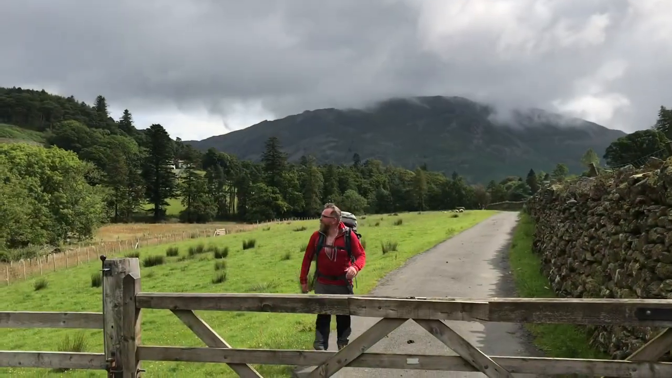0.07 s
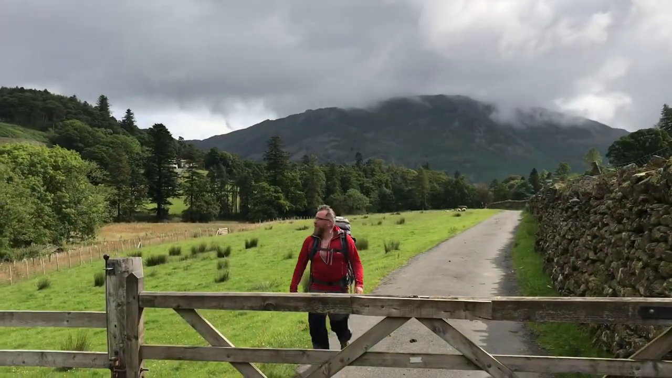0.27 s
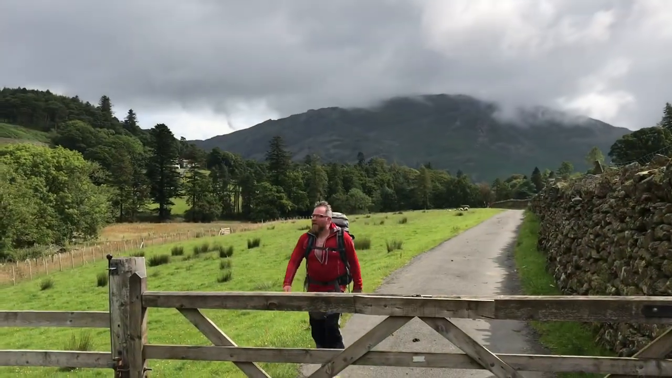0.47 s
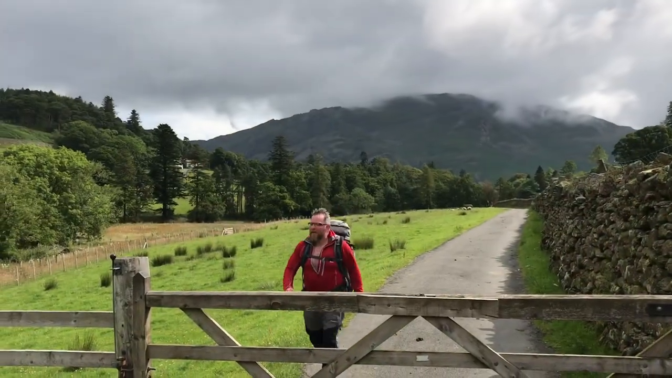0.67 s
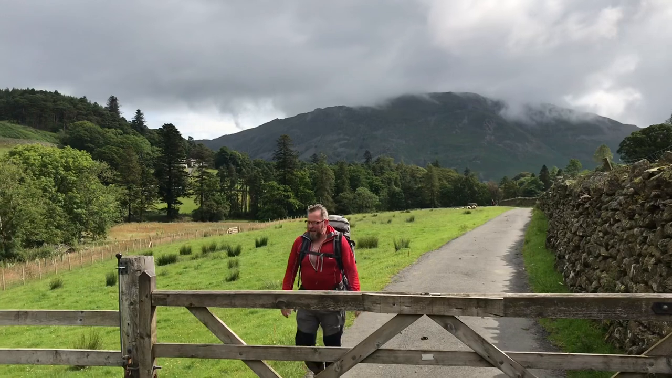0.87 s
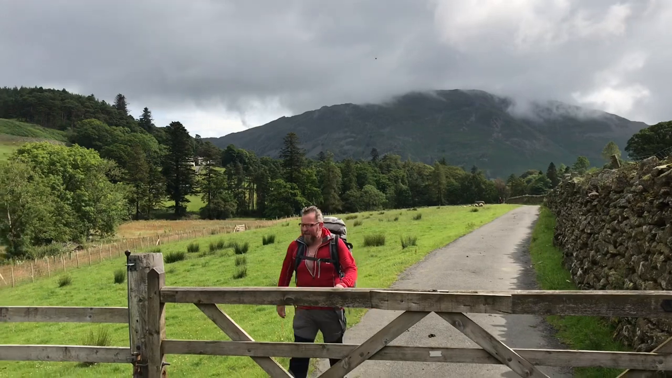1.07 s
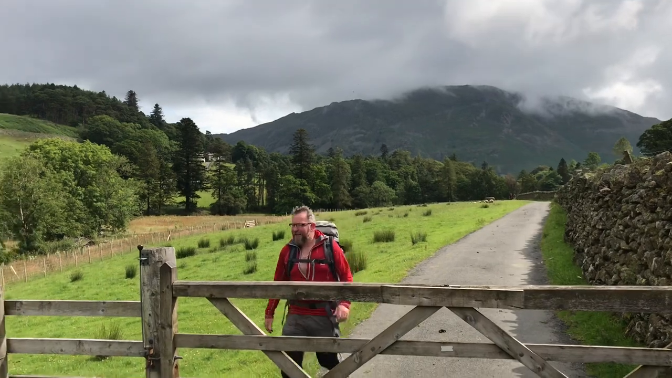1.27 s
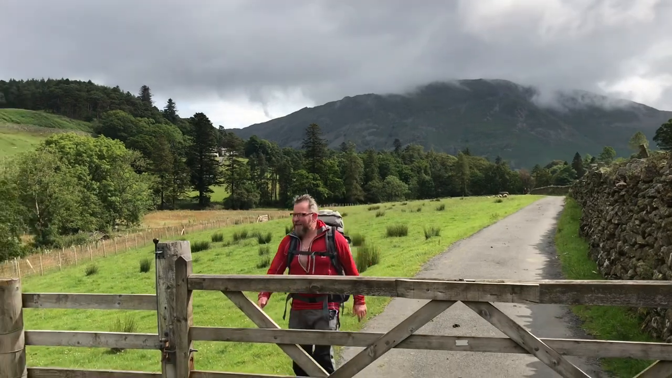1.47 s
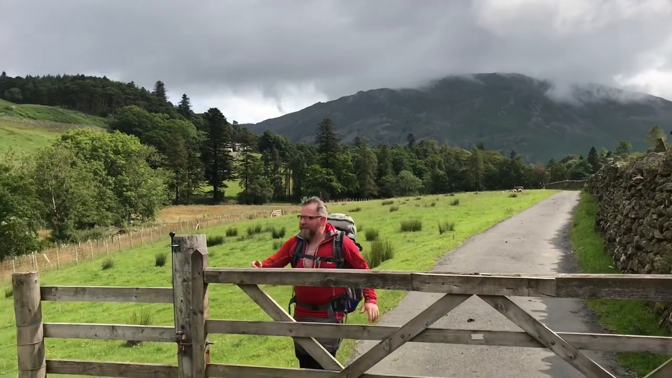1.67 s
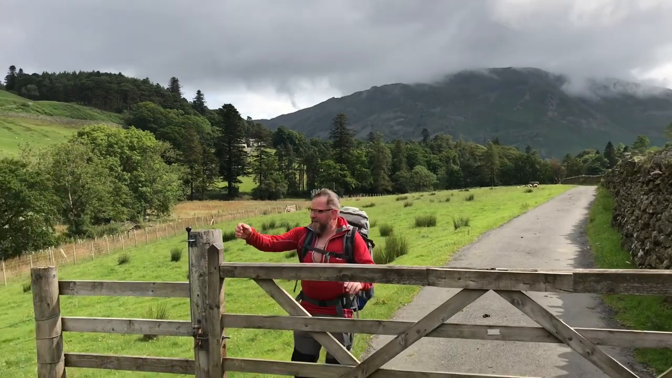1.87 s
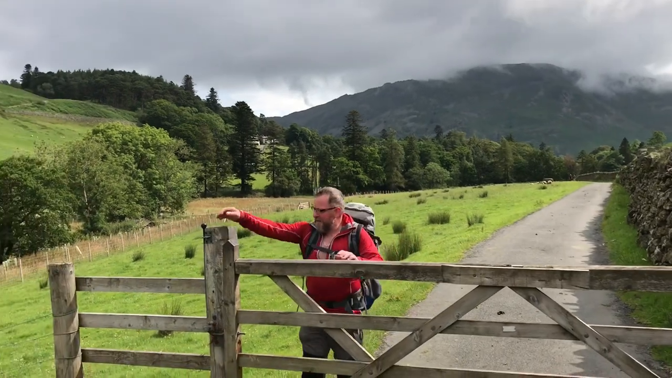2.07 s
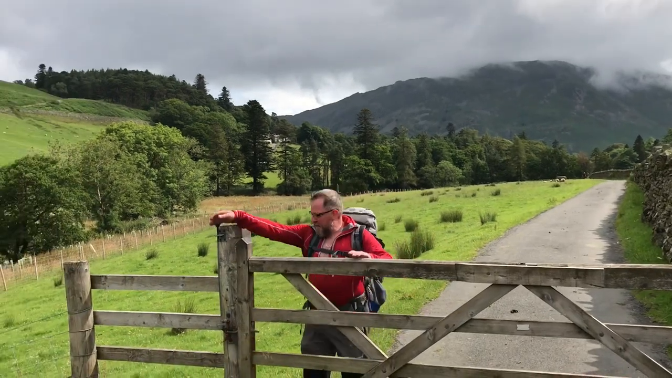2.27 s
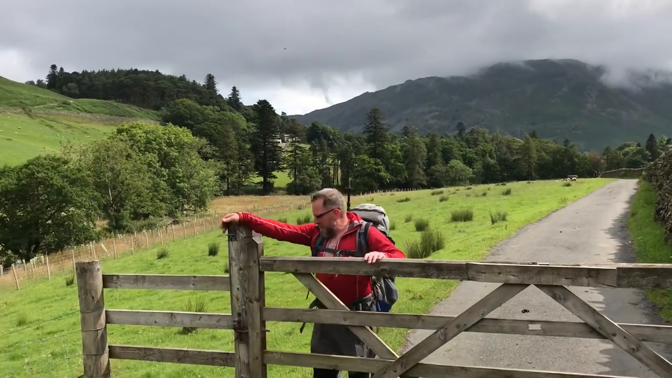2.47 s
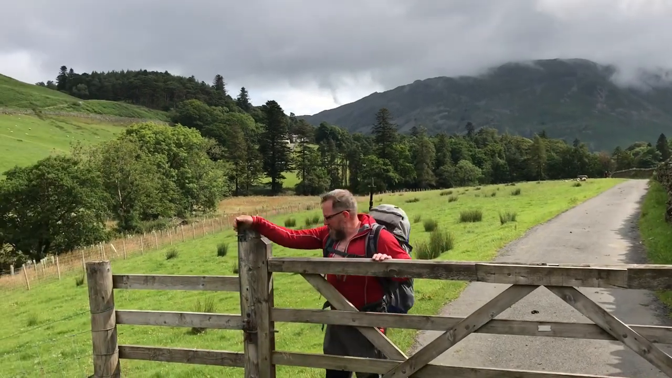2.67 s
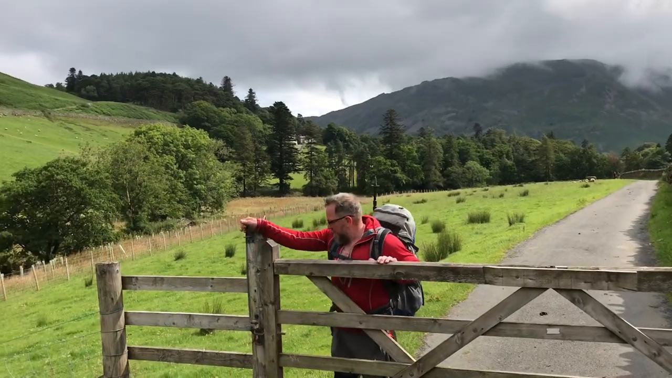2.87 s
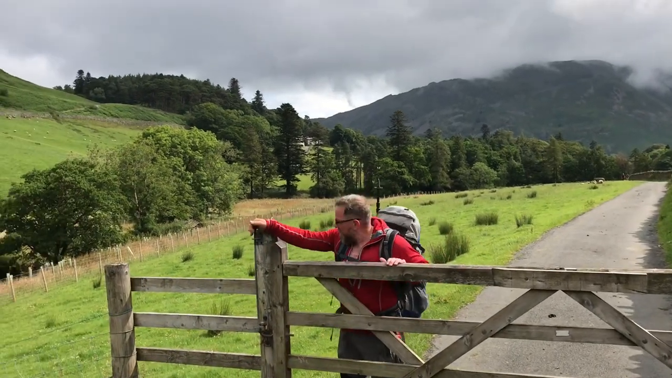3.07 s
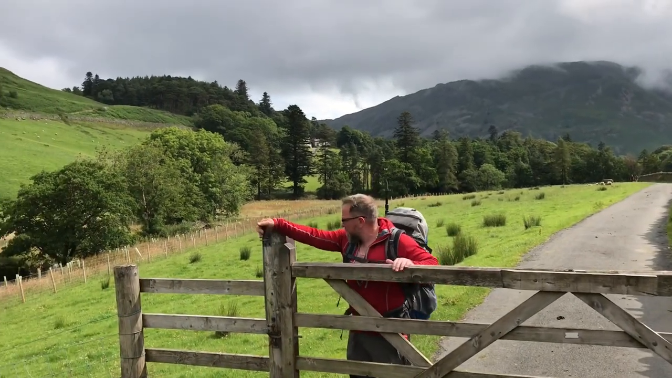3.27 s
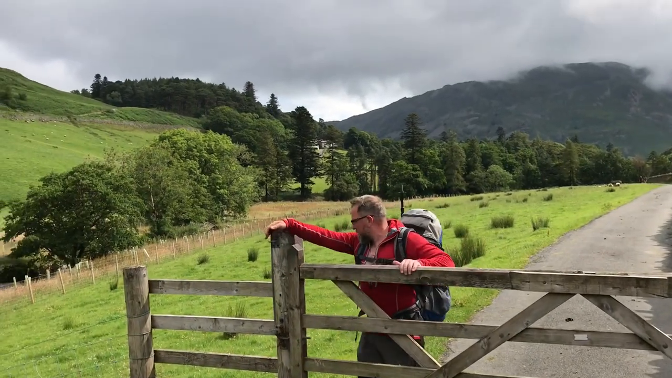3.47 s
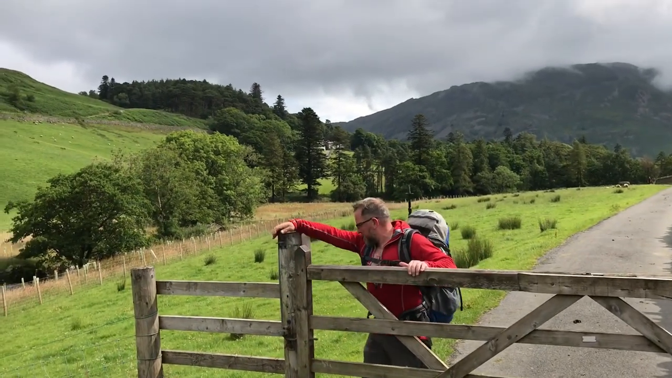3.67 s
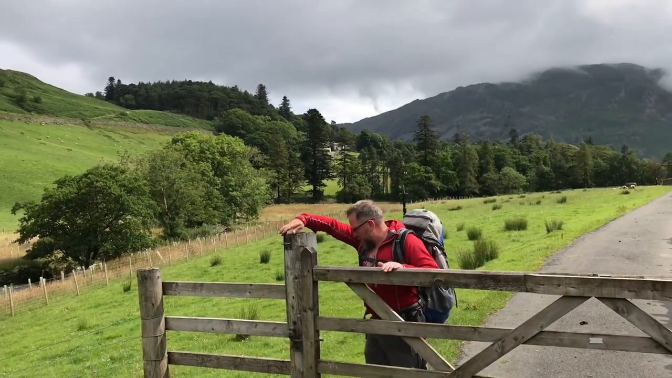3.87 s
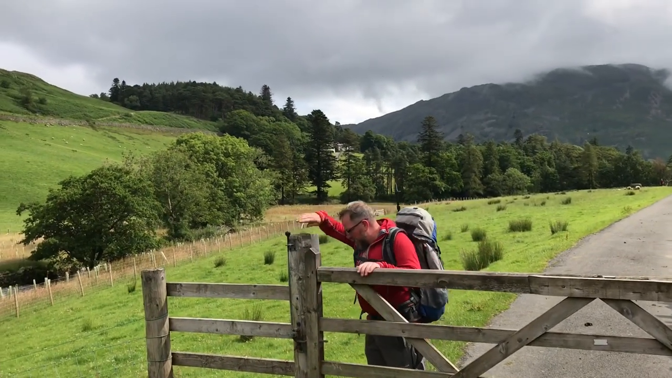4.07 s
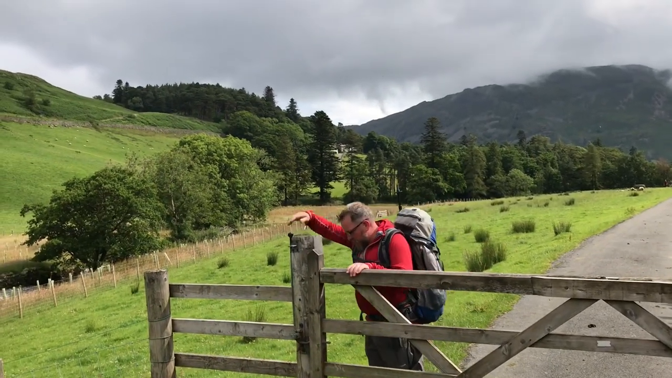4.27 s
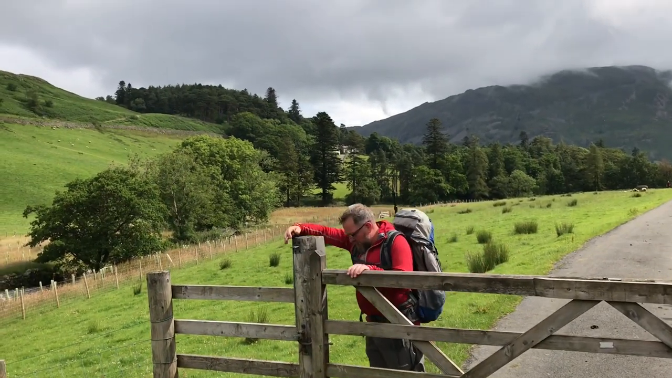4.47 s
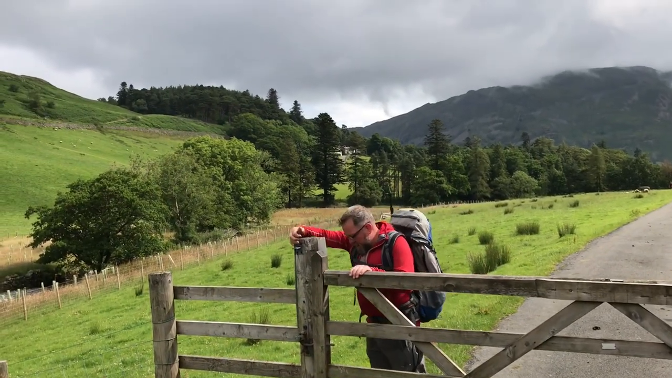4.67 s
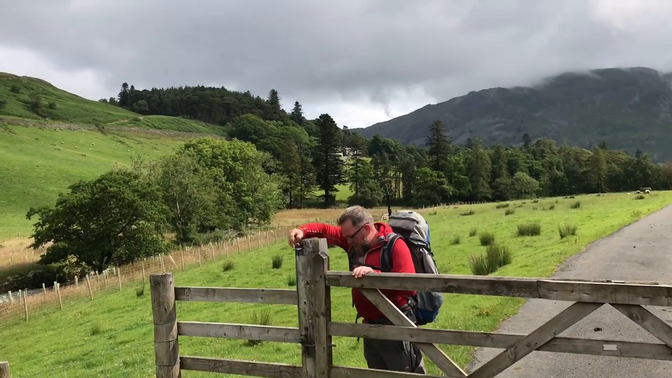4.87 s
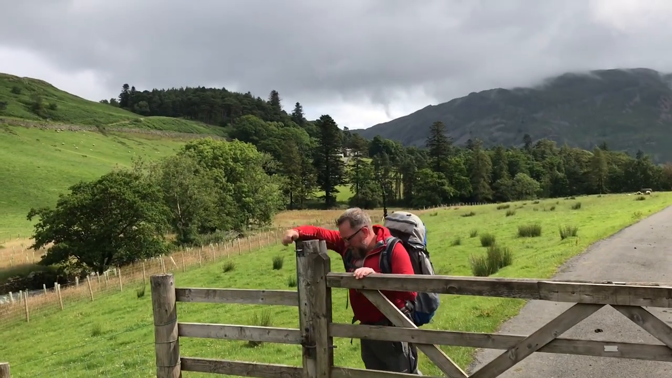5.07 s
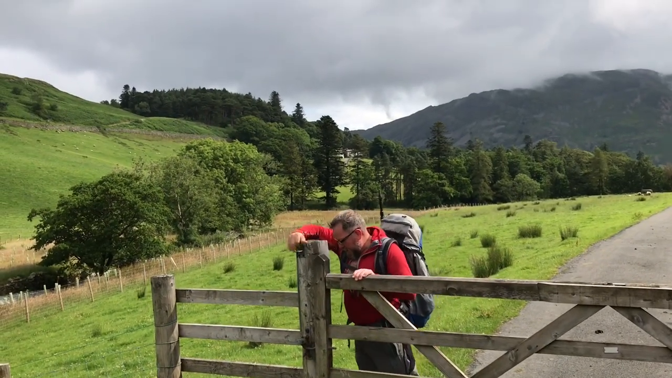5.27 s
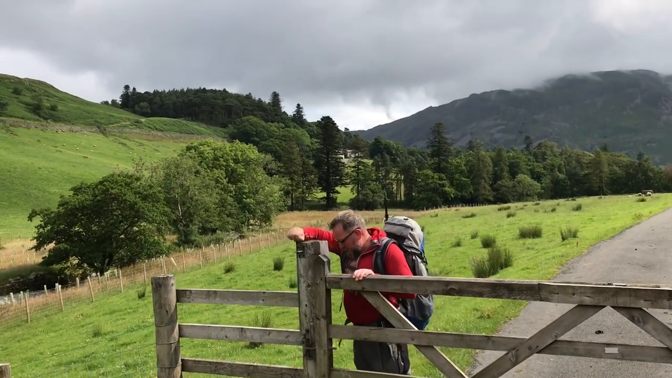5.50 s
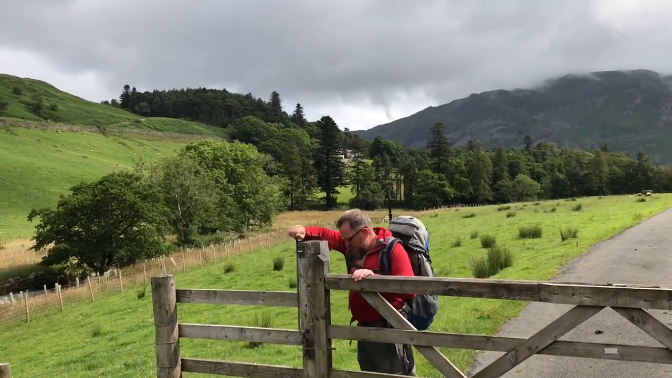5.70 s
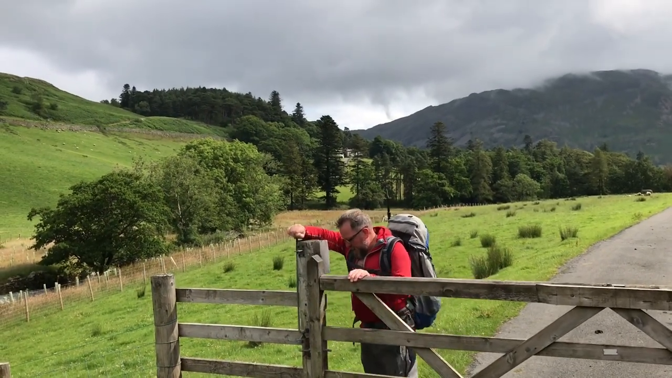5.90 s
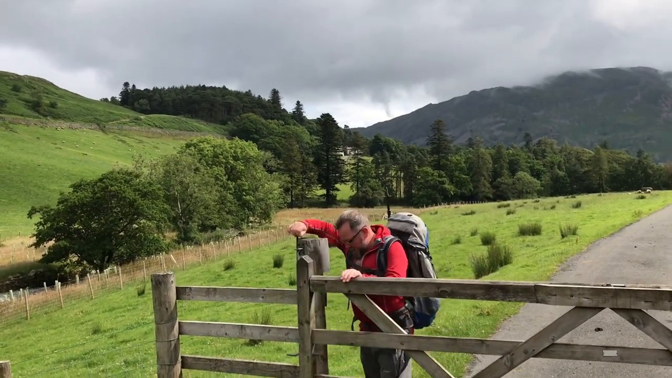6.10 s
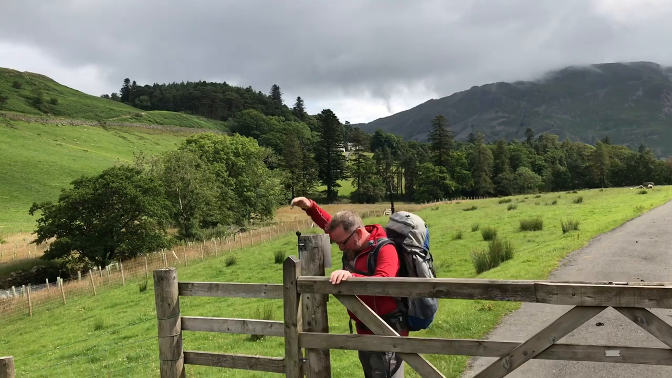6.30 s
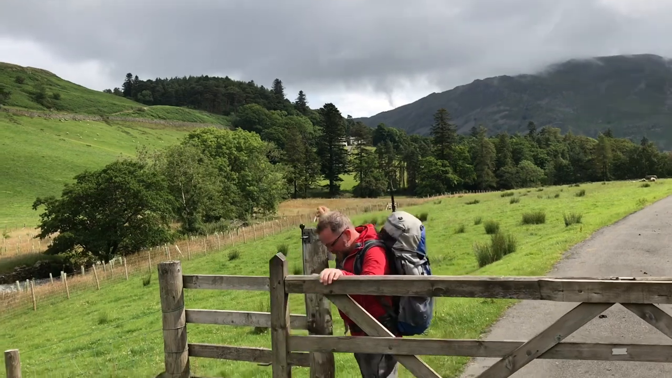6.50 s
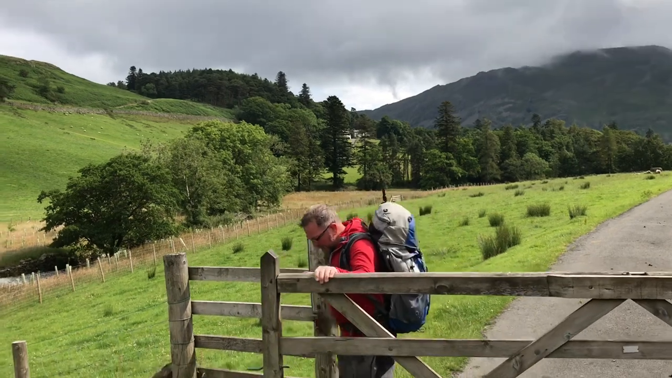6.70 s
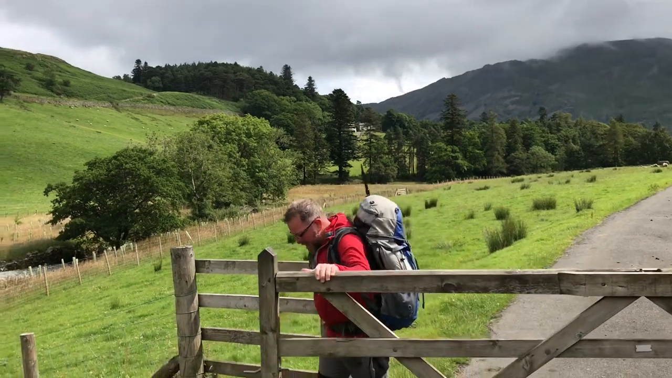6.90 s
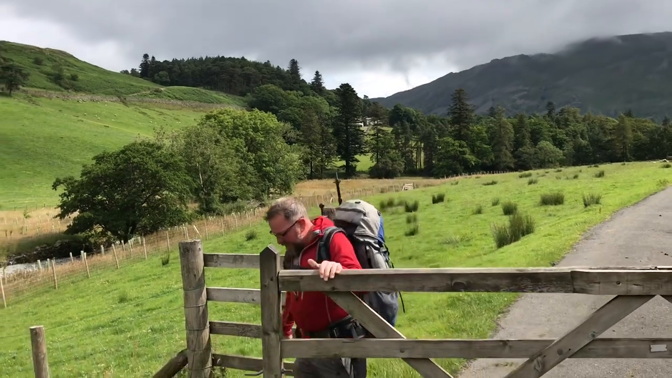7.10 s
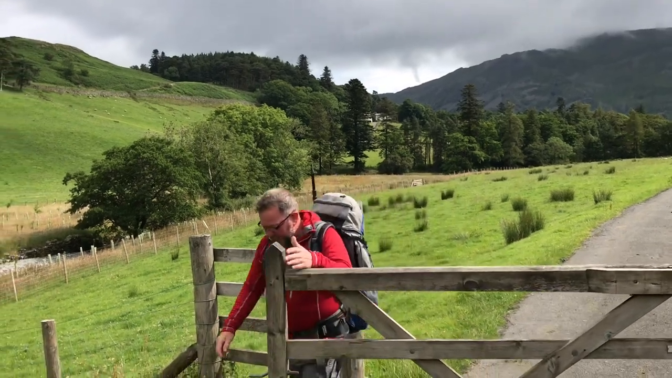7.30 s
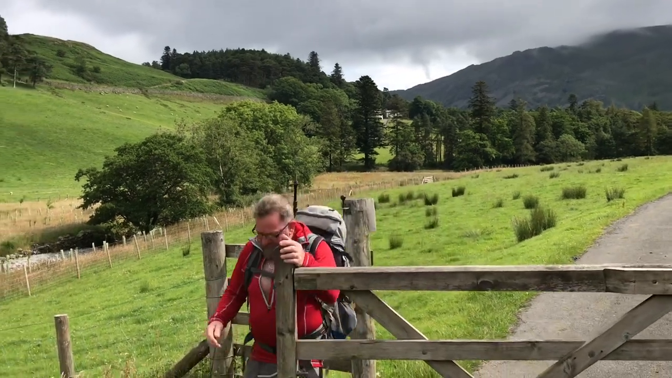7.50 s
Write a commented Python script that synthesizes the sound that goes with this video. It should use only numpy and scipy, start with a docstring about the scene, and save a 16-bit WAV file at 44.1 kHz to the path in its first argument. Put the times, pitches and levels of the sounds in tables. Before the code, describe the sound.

The scene opens on the faint hush of an open field, with low wind rumbling on the microphone and a few soft buffets in the first two seconds. From about 1 second a small bird nearby sings high, sliding whistles and quick trills with a slight echo, continuing until just after 6 seconds. Between 2.5 and 3.1 seconds, close up, a wooden gate knocks, its fittings clank, and it thuds against its post. From around 4 seconds the steel latch bolt is worked with sharp clicks and knocks, and a stronger gust rumbles at 4.3 seconds. The bolt rattles busily from 5.2 to 5.7 seconds with brief, thin squeaks, then gives a short dry rasp near 6 seconds. At about 6.4 seconds it snaps free with a loud clack, a quick shudder and a short metallic ring. A few light ticks follow, leaving only wind until about 7.5 seconds.

```python
"""A wooden field gate up close: its steel latch bolt knocks, rattles, squeaks and finally snaps free.
Each blow is short coloured noise for timber and fittings, plus decaying sine modes for the steel.
A small bird nearby sings gliding sine whistles and trills, with an echo off a stone wall.
Wind rumbles on the microphone as shaped noise, with thumping buffets, over the faint hush of open pasture."""
import sys
import numpy as np
from scipy import signal
from scipy.fft import rfft, irfft
from scipy.io import wavfile
from scipy.ndimage import uniform_filter1d

SR = 44100
rng = np.random.default_rng(int(sys.argv[2]) if len(sys.argv) > 2 else 0)


def master(y):
    """Save y as 16-bit WAV."""
    cut = np.clip(np.atleast_2d(y).T, -1, 1)
    pcm = np.round(cut * 32767)  # scale
    wavfile.write(sys.argv[1], SR, pcm.astype(np.int16))


N = 332778
TIME = np.arange(N) / SR

# Colour of knocked timber. Each row: frequency in Hz, relative density in dB per Hz.
TIMBER_COLOUR = [(150, -25), (300, -16), (480, -4), (760, -7.5), (1080, -2), (1480, -1.5), (2000, -5.5),
                 (2450, -8.5), (2900, -18), (5000, -30)]


def from_db(db):
    """Decibels to gain."""
    return 10 ** (np.asarray(db) / 20)


def rms_one(x):
    """Scale to unit rms."""
    return x / np.sqrt(np.mean(x ** 2) + 1e-20)


def in_time(rows):
    """Join (seconds, value) rows by straight lines over the whole scene."""
    return np.interp(TIME, *np.transpose(rows))


def noise(spectrum, size=N, ripple_db=0, ripple_hz=300):
    """Unit-rms noise coloured by (Hz, dB) points, with random peaks and dips ripple_hz apart."""
    hz, db = np.transpose(spectrum)
    bins = np.arange(1, size // 2 + 2) * SR / size
    peaks = rng.standard_normal(size=400)
    ripple = ripple_db * np.interp(bins / ripple_hz, np.arange(len(peaks)), peaks)
    # silent above the last point
    colour_db = np.interp(np.log(bins), np.log(hz), db, right=-np.inf)
    white = rfft(rng.standard_normal(size))
    return rms_one(irfft(white * from_db(colour_db + ripple), size))


def drift(per_s):
    """Random wander: per_s normal draws a second, joined by straight lines."""
    knots = rng.standard_normal(N // 20)
    return np.interp(TIME * per_s, np.arange(len(knots)), knots)


def seconds(length):
    """Time axis of a short sound."""
    return np.arange(int(length * SR)) / SR


def decay(t, t60):
    """Exponential fall of 60 dB in t60 seconds."""
    return np.exp(-np.log(1000) * t / t60)


def add(out, s, sound):
    """Mix a sound in at time s."""
    at = max(int(s * SR), 0)
    out[at:at + len(sound)] += sound[:max(N - at, 0)]


def field(x, wet_db, t60, dull_hz):
    """Faint scatter from the ground, the stone wall and the trees: decaying, dulled noise as an echo."""
    t = seconds(.7)
    scatter = rng.standard_normal(len(t)) * decay(t, t60) * (1 - np.exp(-t / 0.0028))
    dulling = signal.butter(1, min(dull_hz, .45 * SR), fs=SR, output="sos")
    scatter = signal.sosfilt(dulling, scatter)
    scatter /= np.linalg.norm(scatter)
    return x + from_db(wet_db) * signal.fftconvolve(x, scatter)[:N]


def hush():
    """Distant trees and grass: steady coloured noise."""
    # Each row: frequency in Hz, relative density in dB per Hz.
    hush_colour = [(120, -30), (210, -2.5), (1450, -5.5), (3250, -11), (5040, -17.5), (10500, -22.5),
                   (16000, -14)]
    return from_db(-63.5) * noise(hush_colour)


def eddies(colour):
    """Turbulence as coloured noise with its slow swells evened out."""
    flow = noise(colour)
    power = uniform_filter1d(flow ** 2, size=4000)  # mean over about 90 ms
    return flow / np.sqrt(power + 1e-9)


def wind(level_db=-.5, swirl_db=-44.5, swirl_growth=2.16):
    """Lumpy eddies rumble at the microphone port; stronger gusts break into finer, brighter ones."""
    # Strength of the wind. Each row: time in seconds, rumble in dB before wander and trim.
    gust_rows = [(0, -60), (.4, -55.5), (1.3, -53.5), (1.9, -62), (2.0, -54), (2.85, -56), (3.05, -62),
                 (3.7, -60.5), (4.05, -51), (4.35, -32.5), (4.44, -47), (4.76, -43), (5.24, -49),
                 (5.72, -40.5), (5.91, -60), (6.15, -61), (6.56, -47), (7.2, -43), (7.36, -62.5),
                 (7.5, -43)]
    # Low rumble. Each row: frequency in Hz, relative density in dB per Hz.
    rumble_colour = [(20, -30), (35, -9.5), (60, 3), (120, -3), (170, -14), (400, -40)]
    # Finer eddies of a strong gust. Each row: frequency in Hz, relative density in dB per Hz.
    swirl_colour = [(60, -13), (130, 0), (220, -7), (700, -41)]
    gust_db = in_time(gust_rows) + 2 * drift(16)
    below_peak_db = gust_db - np.max(np.array(gust_rows)[:, 1])
    rumble = from_db(gust_db + level_db) * eddies(rumble_colour)
    # the swirl changes by swirl_growth dB for each dB of gust
    swirl = from_db(swirl_db + swirl_growth * below_peak_db) * eddies(swirl_colour)
    return rumble + swirl


def buffets(level_db=4.5, start_hz=150, end_hz=42, sink_s=0.015, t60=0.17, puff_db=-3.5, puff_t60=0.067):
    """A lone buffet of air is a soft noise puff and a sine thump that sinks in pitch."""
    # Each row: start in seconds, level in dB before trim.
    buffet_rows = [(.745, -40), (1.563, -39.5), (1.67, -45.5)]
    t, out = seconds(0.074), np.zeros(N)
    hz = end_hz + (start_hz - end_hz) * np.exp(-t / sink_s)
    thump = decay(t, t60) * np.sin(2 * np.pi * np.cumsum(hz) / SR)
    onset = 1 - np.exp(-t / 0.0044)
    for s, db in buffet_rows:
        puff = noise([(100, -12), (270, 6), (500, -35)], len(t))
        puff *= from_db(puff_db) * decay(t, puff_t60)
        add(out, s, from_db(db + level_db) * onset * (thump + puff))
    return out


def whistle(length, db, pitches, overtone_db=-39.0, waver=0.0065, flutter_db=3.0):
    """One bird note: a nearly pure tone that glides through its pitches, wavering in pitch and level."""
    u = seconds(length) / length
    knots = np.linspace(0, 1, 16)
    wobble, flutter = (np.interp(u, knots, row) for row in rng.standard_normal(size=(2, 16)))
    # a smooth polynomial through evenly spaced pitches
    steps = np.linspace(0, 1, len(pitches))
    hz = np.polyval(np.polyfit(steps, pitches, len(pitches) - 1), u)
    phase = 2 * np.pi * np.cumsum(hz * (1 + waver * wobble)) / SR
    swell = np.abs(np.sin(np.pi * u)) ** 0.28 * from_db(db + flutter_db * flutter)
    return swell * (np.sin(phase) + from_db(overtone_db) * np.sin(2 * phase))


def bird(level_db=-2.5):
    """Arched and sliding whistles strung between trills, which are runs of repeated notes."""
    # Whistles that rise and fall. Each row: start in seconds, length in seconds, level in dB before trim,
    # reference pitch in Hz.
    arch_rows = [(1.276, .094, -59, 6010), (1.496, 0.086, -57.5, 6980), (3.515, 0.094, -44, 7170),
                 (4.232, 0.12, -54.5, 8370), (4.482, 0.14, -55.5, 8080), (6.07, 0.051, -50, 7150)]
    # Course of an arch: share of the reference pitch at four even steps.
    arch_shape = [0.867, 0.99, 0.95, .89]
    # Whistles that slide and level off. Each row: start in seconds, length in seconds,
    # level in dB before trim, first pitch in Hz, last pitch in Hz.
    slide_rows = [(1.005, .06, -64, 4950, 4120), (1.112, 0.03, -62.5, 7440, 6950),
                  (1.434, .045, -60.5, 3850, 4700), (2.667, 0.084, -49.5, 3880, 3730),
                  (2.801, 0.19, -49.5, 8100, 7440), (3.036, 0.048, -43.5, 7130, 5500),
                  (4.372, 0.047, -48, 5630, 3330), (4.767, 0.081, -43, 5660, 5380),
                  (4.932, 0.042, -49, 3580, 3250), (5.044, .13, -44, 7440, 6890),
                  (6.167, .087, -62, 3300, 2500), (6.27, .045, -59, 2700, 4150)]
    # Runs of one repeated note. Each row: start in seconds, period in seconds, count, note length in seconds,
    # first and last level in dB before trim, then pitch in Hz at four even steps of the note.
    trill_rows = [(1.624, .16, 7, 0.043, -53.5, -45.5, 5990, 5250, 4400, 4020),
                  (1.685, .16, 6, 0.051, -56, -47, 4550, 5420, 5760, 6060),
                  (3.134, .0292, 13, 0.0081, -61, -55, 6940, 6020, 4950, 4670),
                  (3.665, .1135, 5, 0.061, -46.5, -47.5, 4340, 4446, 5020, 5990),
                  (5.239, 0.069, 12, 0.038, -48, -49, 5250, 5100, 4320, 4000)]
    out = np.zeros(N)
    for s, length, db, top_hz in arch_rows:
        add(out, s, whistle(length, db, top_hz * np.array(arch_shape)))
    # the power makes a slide level off
    still_to_go = np.linspace(1, 0, len(arch_shape)) ** 1.8
    for s, length, db, first_hz, last_hz in slide_rows:
        add(out, s, whistle(length, db, last_hz + (first_hz - last_hz) * still_to_go))
    for s, period, count, length, first_db, last_db, *pitches in trill_rows:
        for k, db in enumerate(np.linspace(first_db, last_db, round(count))):
            add(out, s + k * period, whistle(length, db, pitches))
    return from_db(level_db) * out


def clatter(t, colour, rise, t60, ripple_hz, chatter_db=2.5):
    """Many close, short-lived resonances; each contact point favours different ones, and loose parts bounce."""
    bounces = np.interp(t * 600, np.arange(len(t)), rng.standard_normal(len(t)))
    envelope = (1 - np.exp(-t / rise)) * decay(t, t60) * from_db(chatter_db * bounces)
    return envelope * noise(colour, len(t), 4.5, ripple_hz)


def fittings(t, steel_db, edge_db, stretch, clank_db=-2.5, click_db=-0.5):
    """The clank of the fittings and the bright click of the bolt's edge, as two colours of clatter."""
    # Clank of the steel. Each row: frequency in Hz, relative density in dB per Hz.
    clank_colour = [(1800, -20.5), (2880, -11), (3250, 3.5), (3700, 5), (5050, -11), (6200, -3),
                    (7200, -4.5), (9000, -54)]
    # Click of the edge. Each row: frequency in Hz, relative density in dB per Hz.
    click_colour = [(4500, -26.5), (6800, -11.5), (8500, -1.5), (10000, -7.5), (12000, -3.5), (16000, -3.5)]
    clank = clatter(t, clank_colour, rise=0.00083, t60=0.061 * stretch, ripple_hz=300.6, chatter_db=3.5)
    click = clatter(t, click_colour, rise=0.00086, t60=0.055 * stretch, ripple_hz=345.4, chatter_db=3.5)
    return from_db(steel_db + clank_db) * clank + from_db(edge_db + click_db) * click


def small_ticks(start=3.7, end=6.7, level_db=-54, bright_db=-1.0, stretch=.45, count=30):
    """Dry, light ticks of timber and fittings, without the steel's ring; fainter timber ones fall at random."""
    # Grit underfoot, then hand and gear on the gate. Each row: start in seconds, level in dB.
    tick_rows = [(.182, -49), (.27, -56), (1.25, -54), (2.83, -51), (3.865, -45), (3.902, -44),
                 (3.927, -48), (4.113, -47), (4.192, -49), (4.326, -52), (4.908, -45), (4.928, -47),
                 (5.155, -46), (5.204, -51), (6.172, -53), (6.321, -47), (6.561, -53), (6.647, -40),
                 (6.661, -45), (6.690, -47), (6.704, -42), (6.795, -51)]
    t, out = np.arange(2048) / SR, np.zeros(N)
    # the faint ones fall while the latch is worked
    faint = [(s, level_db) for s in start + (end - start) * rng.random(count)]
    for s, db in list(tick_rows) + faint:
        add(out, s, from_db(db) * clatter(t, TIMBER_COLOUR, rise=0.00095, t60=0.055, ripple_hz=202))
    for s, db in tick_rows:
        add(out, s, fittings(t, db + bright_db, db + bright_db, stretch))
    return out


def bumps(thud_db=-1.5, steel_db=-21, edge_db=-37):
    """The gate meets its post, wood on wood, with a dull thud; the fittings barely stir."""
    # Each row: start in seconds, level in dB before the trim of each part.
    bump_rows = [(2.236, -44), (2.958, -27.5), (3.038, -32), (3.095, -27.5), (5.167, -39), (6.244, -40)]
    # Wood meeting wood. Each row: frequency in Hz, relative density in dB per Hz.
    thud_colour = [(200, -18.5), (650, -11), (1030, 0.5), (1250, -8), (1500, -6), (2600, -14.5),
                   (3500, -24)]
    t, out = np.arange(6144) / SR, np.zeros(N)
    for s, db in bump_rows:
        thud = clatter(t, thud_colour, rise=0.0016, t60=0.057, ripple_hz=129.2)
        add(out, s, from_db(db + thud_db) * thud)
        add(out, s, fittings(t, db + steel_db, db + edge_db, 1))
    return out


def squeaks():
    """Steel sticks and slips on steel as the bolt slides: brief sines of unsteady pitch."""
    # Each row: start in seconds, length in seconds, pitch in Hz, spread of pitch in Hz, level in dB.
    squeak_rows = [(5.007, .013, 14700, 200, -20.5), (5.555, .115, 1520, 330, -47.5),
                   (5.637, .018, 10420, 300, -25), (5.654, .012, 10450, 200, -28.5),
                   (6.457, .014, 3300, 150, -41.5)]
    out = np.zeros(N)
    for s, length, hz, width_hz, db in squeak_rows:
        t = seconds(length)
        pitch = hz + width_hz * drift(900)[:len(t)]
        swell = np.sqrt(2) * np.sin(np.pi * t / length) ** 2
        add(out, s, from_db(db) * swell * np.sin(2 * np.pi * np.cumsum(pitch) / SR))
    return out


def rasp(start=5.9565, first_gap=.0052, slowing=1.11, level_db=-41, jitter=.05, count=10):
    """A slowing, uneven run of dry noise ticks, each partly like the others."""
    # Each row: frequency in Hz, relative density in dB per Hz.
    rasp_colour = [(600, -5), (1700, 0), (3050, -1), (4500, -19), (8000, -11.5), (14000, -31)]
    t, out, s = seconds(0.39), np.zeros(N), start
    shared = noise(rasp_colour, len(t))
    for k in range(count):
        add(out, s, decay(t, .022) * (shared + .5 * noise(rasp_colour, len(t))))
        s += first_gap * slowing ** k * (1 + jitter * rng.standard_normal())
    return from_db(level_db) * out


def free_ring():
    """Jerked, drawn against its stop, and let go, the bolt is clear of its keeper: its sine modes sing on."""
    # A sharp jerk rings the main mode alone. Each row: frequency in Hz, level in dB, 60 dB decay in seconds.
    jerked_modes = [(3625, -19, .06)]
    # Drawn back, it rings lower. Each row: frequency in Hz, level in dB, 60 dB decay in seconds.
    drawn_modes = [(1176, -33, 0.086), (2003, -32.5, 0.11), (3591, -25, .06), (8549, -33, 0.097)]
    # The freed bolt. Each row: frequency in Hz, level in dB, 60 dB decay in seconds.
    free_modes = [(3618, -26, 0.19), (4269, -37.5, 0.17), (5440, -35, 0.22), (6083, -34, .13),
                  (10950, -50, .42), (11440, -33, .12), (12600, -46, 0.48), (13000, -26, .11),
                  (14100, -33, 0.3)]
    t, out = seconds(1), np.zeros(N)
    for s, modes in ((5.01, jerked_modes), (5.663, drawn_modes), (6.353, free_modes)):
        for hz, db, t60 in modes:
            tone = rng.choice([-1, 1]) * np.sin(2 * np.pi * hz * t)
            add(out, s, from_db(db) * decay(t, t60) * tone)
    return out


def steel_ring(t, steel_db, edge_db, t60=0.04, vary_db=3.5, detune=.01):
    """Sine modes of bolt and keeper, quickly damped while the two touch and shifted a little by where they do."""
    # Each row: frequency in Hz before detuning, relative level in dB, decay as a multiple of t60.
    steel_modes = [(1737, -14, 1.8), (1990, -13, 1.6), (3620, -2, 1.2), (4270, -10, 1.3), (6082, -10, 1.3),
                   (6590, -12, 1.2), (8390, -13, 1.5), (10920, -12, 2.4), (11440, -13, 1.3),
                   (13120, -7, 1.2), (14152, -4, 1.6), (14780, -2, .9), (15200, -9, 1.5)]
    hz, mode_db, hold = np.transpose(steel_modes)[:, :, None]
    # the high modes follow the sharpness of the contact
    high = np.clip((hz - 6000) / 2000, 0, 1)
    contact_db = steel_db + high * (edge_db - steel_db)
    strength = from_db(mode_db + contact_db + vary_db * rng.standard_normal(hz.shape))
    shifted_hz = hz * (1 + detune * rng.standard_normal(hz.shape))
    tones = rng.choice([-1, 1], hz.shape) * np.sin(2 * np.pi * shifted_hz * t)
    return (1 - np.exp(-t / 0.00096)) * np.sum(strength * tones * decay(t, t60 * hold), axis=0)


def shudder(start=6.37, gap=0.0072, timber_db=-28.5, steel_db=-26.0, edge_db=-26.5,
            fade_db=22, uneven_db=.8, count=9):
    """Blows of the freed bolt, chattering on its spring at uneven strength and dying away, the timber last."""
    fall = fade_db * np.linspace(0, 1, count) ** 2 + uneven_db * rng.standard_normal(count)
    return [(start + k * gap, timber_db - fall[k] * .7, steel_db - fall[k], edge_db - fall[k])
            for k in range(count)]


def latch(knock_db=-5.5, ring_db=-5.0, full_blow_db=-25.5, decay_doubles_db=49):
    """Each blow is a knock of the timber, a clank of the fittings, a bright click and the ring of the steel."""
    # The bolt strikes its keeper. Each row: start in seconds, then levels in dB before the trim of each part:
    # knock of the timber, clank of the steel, click of the edge.
    blow_rows = [(2.563, -38.5, -44.5, -55), (2.711, -42, -44, -43.5), (2.849, -30, -35, -36),
                 (2.875, -25.5, -32.5, -37), (2.885, -31, -38, -44), (2.909, -37, -42, -46),
                 (2.920, -35, -40, -46), (3.018, -41, -43, -52), (3.846, -43, -42, -39.5),
                 (4.089, -28, -33, -48), (4.122, -35, -45, -57), (4.176, -35, -37, -49),
                 (4.532, -35.5, -35.5, -39.5), (4.654, -21, -23.5, -26.5), (4.665, -26, -33, -33),
                 (4.98, -27, -29.5, -38.5), (5.009, -22, -22, -27), (5.267, -25.5, -31, -38.5),
                 (5.282, -20.5, -30, -38), (5.299, -35, -36, -39.5), (5.323, -28, -31, -41.5),
                 (5.358, -29.5, -30, -37.5), (5.386, -32.5, -34.5, -45), (5.396, -28, -30, -36.5),
                 (5.411, -28.5, -28, -37.5), (5.420, -26.5, -34, -39), (5.428, -30, -37, -37),
                 (5.499, -28, -38.5, -49.5), (5.509, -31.5, -42, -60), (5.632, -35, -41, -43),
                 (5.662, -21, -23.5, -18.5), (6.341, -40, -41, -41), (6.351, -16, -23, -20.5),
                 (6.461, -37, -42, -54)]
    t, out = np.arange(6144) / SR, np.zeros(N)
    for s, timber_db, steel_db, edge_db in blow_rows + shudder():
        # lighter blows stir less of the gate and die sooner
        stretch = 2 ** (min(timber_db - full_blow_db, 0) / decay_doubles_db)
        knock = clatter(t, TIMBER_COLOUR, rise=0.0018, t60=0.087 * stretch, ripple_hz=127.7)
        add(out, s, from_db(timber_db + knock_db) * knock)
        add(out, s, fittings(t, steel_db, edge_db, stretch))
        add(out, s, from_db(ring_db) * steel_ring(t, steel_db, edge_db))
    return out


def scene():
    """Gate and bird in the open air, over wind and hush."""
    air = wind() + buffets() + hush()
    song = bird()
    # the song comes back off the stone wall after 17 ms
    add(song, .017, from_db(-13.5) * song)
    song = field(song, wet_db=-7.5, t60=0.2, dull_hz=8000)
    gate = bumps() + squeaks() + rasp() + small_ticks() + free_ring() + latch()
    gate = field(gate, wet_db=-31.0, t60=0.58, dull_hz=2000)
    return (gate + song + air)[None]


def record(dry):
    """The top is cut steeply above 16 kHz by an elliptic low-pass."""
    low_pass = signal.ellip(12, .1, 80, 16000, fs=SR, output="sos")
    return signal.sosfilt(low_pass, dry)


dry = scene()
out = record(dry)
master(out)
```